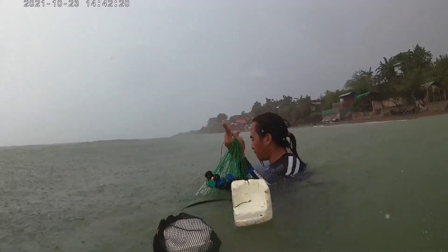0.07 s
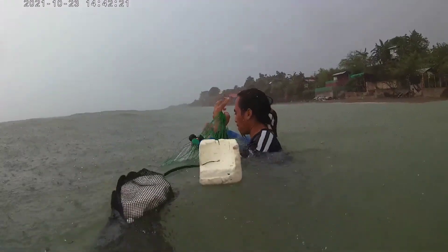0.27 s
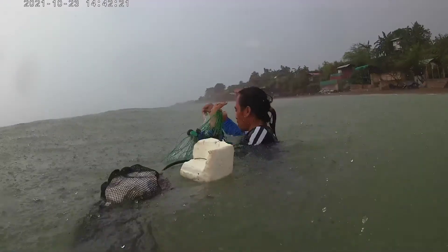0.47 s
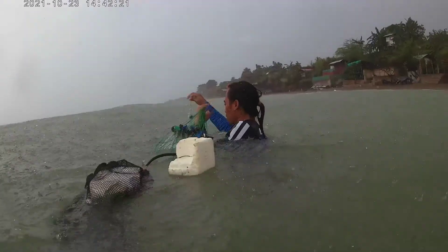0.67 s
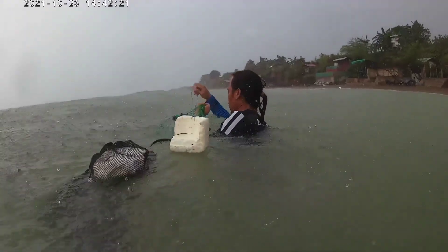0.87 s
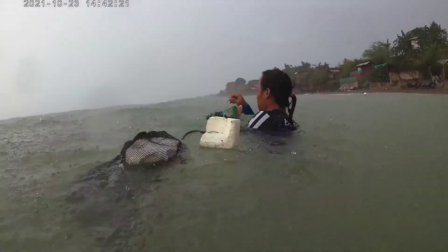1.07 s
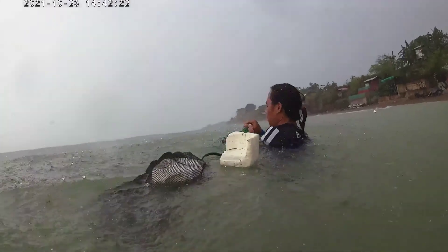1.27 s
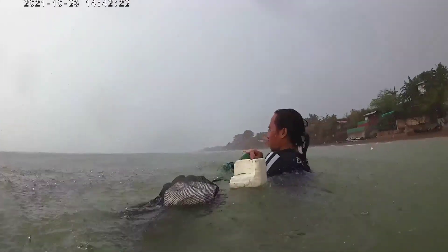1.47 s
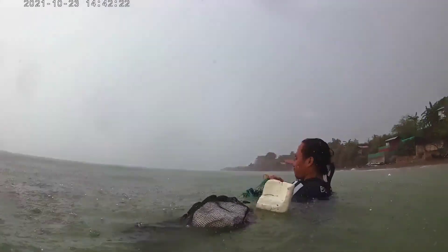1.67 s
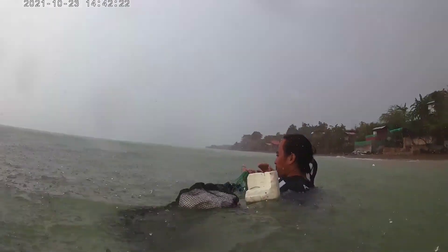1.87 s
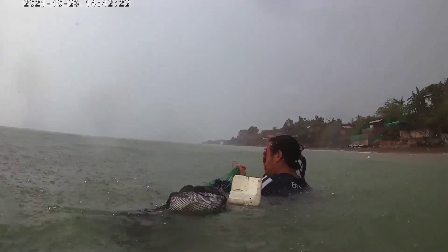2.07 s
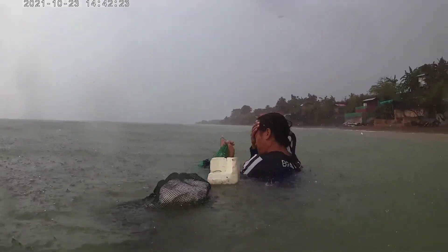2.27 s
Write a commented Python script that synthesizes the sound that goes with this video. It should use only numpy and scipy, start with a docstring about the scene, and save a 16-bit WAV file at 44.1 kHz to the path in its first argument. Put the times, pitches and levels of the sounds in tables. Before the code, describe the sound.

Irregular close taps, ticks and small thumps come from rain striking a camera housing held at sea level. A few tiny bubbles plop among them, over soft rain hiss and rumbling swell. The microphone inside sounds dull and enclosed.

```python
"""Raindrops and small splashes strike a waterproof camera case, held at the surface of the sea. Heard point-
blank, each drop rings the case with a thump, a knock and a tick; some trap an air bubble that sings briefly.
Behind them fine rain patters on the case, rain hisses on the water around it and swell rumbles against it. The
sound reaches only to about 4 kHz and overloads on the hardest hits."""
import sys
import numpy as np
from scipy import signal
from scipy.fft import rfft, irfft
from scipy.io import wavfile

SR = 44100
rng = np.random.default_rng(int(sys.argv[2]) if len(sys.argv) > 2 else 0)


def output_pcm(signal):
    """Save a mono or channel-first signal as 16-bit PCM at the path in sys.argv[1].

    Samples are clipped to [-1, 1] before scaling.
    """
    pcm = np.clip(np.atleast_2d(signal).T, -1, 1) * 32767
    wavfile.write(sys.argv[1], SR, np.round(pcm).astype(np.int16))


N = 101650

# drops on the case, peak levels before the trims
# (time [s], knock [dB], thump [dB], tick [dB], knock centre [Hz], tick centre [Hz])
DROPS = [(0.0224,-8,-15,-13.5,1280,2400),(.0280,-5,-29.5,-14.5,1203,2580),(0.069,-26,-56,-13,1310,2870),(0.0804,-22,-33,-9,1190,2850),(0.084,-7,-30.5,-19,900,2280),
         (0.268,-23.5,-29,-43.5,1290,2000),(0.3663,-9.5,-10,-26,1316,2380),(0.3777,-13,-20,-15,1250,3600),(0.3897,-16,-19,-38.5,1200,2000),(.5760,-14,-38,-11.5,1010,3070),
         (0.5919,-5.5,-14.5,-12,1238,2520),(0.714,-6,-20.5,-22,1300,2720),(.729,-54,-52,-27,1370,2660),
         (0.8195,-20,-27.5,-25.5,1340,2140),(0.9226,-8,-25,-10.5,1203,1970),(0.9243,-13,-32.5,-35.5,1300,2280),(0.97,-24.5,-34,-31.5,1320,3100),(1.0099,-24,-36.5,-30,1260,2740),(1.1021,-18.5,-22.5,-22,1300,2800),
         (1.1356,-15.5,-22.5,-22.5,1220,2020),(1.1441,-12.5,-18.5,-25.5,1110,2960),(1.1622,-13,-29,-18,1100,2070),
         (1.1948,-11.5,-43,-13,1330,2930),(1.2086,-6,-15,2.5,1184,2356),(1.2933,-21,-45,-62.5,1020,1980),(1.3332,-13.5,-17.5,-35.5,913,2300),
         (1.4283,-25,-37,-19.5,1300,2800),(1.4339,-12.5,-20,-20,1360,2040),(1.4639,-20,-61,-14.5,850,2200),(1.4972,-1,-6.5,-12,1090,2770),(1.537,-23,-29.5,-28,900,2000),
         (1.6347,-10,-35,-7,1150,2760),(1.6622,-14.5,-26,-11,1142,2800),(1.69,-21,-55.5,-18.5,1200,3400),(1.698,-9.5,-31.5,-32,1220,2210),(1.727,-8.5,-10.5,-51,1320,1900),
         (1.754,-13,-24.5,-18.5,1340,2500),(1.793,-10,-32,-40,1320,1900),(1.8154,-19,-49,-11,1280,1960),(1.8444,-9,-21,-17.5,1260,2840),(1.8543,1,-11,5,1110,2690),
         (1.8932,-7,-19,-7,935,1950),(1.9548,-20,-25.5,-16.5,1320,2400),(1.9769,-10,-15.5,-11.5,1050,2550),(2.0264,-18.5,-55,-14.5,1250,2160),(2.0401,-14.5,-13,-23.5,835,2140),
         (2.131,-26,-33.5,-33,1000,2870),(2.1878,-5.5,-21.5,-7.5,1050,2320),(2.2131,-12,-38,-16,1230,2490),(2.2220,-11,-51,-18.5,950,2740)]
# resonances of the case (frequency [Hz], relative level [dB], t60 [s])
CASE_MODES = [(173,-2,0.044),(327,8,0.02),(487,-3,0.0072),(804,-4,0.024),(996,-4,0.023),(1106,-7.5,0.016),(1271.5,1.5,0.016),(1624,-3,0.015),(2079,3.5,0.0076),(2400,3,0.005),(2753,2,0.006),(3271,6,0.01),(3742,0,0.014)]
# trapped air bubbles (time [s], starting pitch [Hz], level [dB], t60 [s])
BUBBLE_NOTES = [(0.1,414,-23,0.012),(0.3657,1200,-19,0.016),(.594,369,-18.5,0.058),(0.717,1897,-11,0.016),(0.717,146,-18,0.038),(1.1030,326,-19,0.045),(1.209,760,-14,0.031),(1.73,326,-22,0.016),(1.733,165,-21,0.045),(1.8541,1021,7,0.015),(1.9763,1562,-7,0.03)]
# fine rain on the case (time [s], level [dB])
PATTER_LEVEL = [(0,-34.5),(.3,-44.5),(.8,-39.5),(1.05,-46),(1.17,-34),(1.28,-53),(1.45,-33.5),(1.7,-41.5),(1.87,-30),(2,-39),(2.3,-42.5)]
# water moving against the case (frequency [Hz], relative density [dB])
RUMBLE_SPECTRUM = [(15,-10),(70,-0.5),(110,-11.5),(160,-2.5),(220,-16),(900,-51.5),(5000,-100)]
# rise and fall of that rumble (time [s], level [dB])
RUMBLE_LEVEL = [(0,-35),(.26,-48),(.42,-40),(.55,-43.5),(.8,-44.5),(.89,-24),(.96,-41),(1.25,-41.5),(1.32,-36.5),(1.4,-44),(1.87,-31.5),(2.13,-39)]
# rain on the sea, heard through the case (frequency [Hz], relative density [dB])
SEA_RAIN_SPECTRUM = [(100,-15.5),(250,2),(350,4),(780,-6.5),(1130,-11),(1320,0),(1600,-6),(2050,0),(2600,-29),(4200,-32.5)]

THUMP_LOW_HZ, THUMP_TOP_HZ, KNOCK_TOP_HZ = 89, 670, 1670
THUMP_TRIM_DB, TICK_TRIM_DB = 0.5, 1.5
POCKET_BEST_HZ, POCKET_T60_S = 1280, 0.01
LEAD_IN_SHARE, SPREAD_SHARE, SPRAY_SHARE = 0.028, 0.055, 0.023
LEAD_IN_S, SPREAD_S, SPRAY_S = 0.0025, 0.0013, 0.009
RAGGED_DB_PER_DB, TYPICAL_DROP_DB = 0.34, -8
MIC_TOP_HZ, MIC_LEAK_DB, BAND_LIMIT_HZ = 3684, -35.5, 15700


def drops_on_case():
    """Point-blank hits: each rings the low, middle and high modes, and an air pocket adds to the knock."""
    out, hz = np.zeros(N), np.array(CASE_MODES)[:, 0]
    low, high = hz < THUMP_TOP_HZ, hz > KNOCK_TOP_HZ
    middle = ~low & ~high
    for start, knock_db, thump_db, tick_db, knock_hz, tick_hz in DROPS:
        modes = case_modes()
        push = splat(max(knock_db, tick_db))
        thump = cut(low @ modes, THUMP_TOP_HZ, "low", order=2)
        thump = cut(thump, THUMP_LOW_HZ, "high", order=2)
        pocket = nearness(knock_hz, POCKET_BEST_HZ) * ring(knock_hz, POCKET_T60_S)
        knock = (nearness(hz, knock_hz) * middle) @ modes + pocket
        knock = cut(knock, KNOCK_TOP_HZ, "low")
        knock = cut(knock, THUMP_TOP_HZ / 2, "high", order=1)
        tick = (nearness(hz, tick_hz) * high) @ modes
        tick = cut(tick, THUMP_TOP_HZ, "high", order=2)
        levels_db = thump_db + THUMP_TRIM_DB, knock_db, tick_db + TICK_TRIM_DB
        lead_s = len(push) / 2 / SR  # the blow sits in the middle of the push
        for part, db in zip((thump, knock, tick), levels_db):
            hit = signal.fftconvolve(part, push)
            add(out, start - lead_s, undb(db) * hit / np.abs(hit).max())
    return out


def splat(strength_db, size=1500):
    """A drop's push: the blow, spreading, faint spray. Weak, glancing drops are more ragged."""
    t = np.arange(-size, size + 1) / SR
    lead_in = LEAD_IN_SHARE * np.exp(-abs(t) / LEAD_IN_S)  # faint, short noise that softens the attack
    blow = t == 0
    spreading = SPREAD_SHARE * np.exp(-abs(t) / SPREAD_S)
    spray = SPRAY_SHARE * np.exp(-abs(t) / SPRAY_S)
    ragged = undb(RAGGED_DB_PER_DB * (TYPICAL_DROP_DB - strength_db))
    return blow + ragged * rng.standard_normal(len(t)) * np.where(t < 0, lead_in, spreading + spray)


def case_modes(scatter_db=1.5, detune=.03):
    """One ring per mode of the case; strength and pitch vary with the spot that is struck."""
    hz, db, t60 = np.array(CASE_MODES).T[:, :, None]
    pitch_draw, level_draw = rng.standard_normal((2, len(CASE_MODES), 1))
    return undb(db + scatter_db * level_draw) * ring(hz * (1 + detune * pitch_draw), t60)


def ring(hz, t60, build_s=0.00038, size=4096):
    """A struck resonance: a sine that builds up and dies away."""
    t = np.arange(size) / SR
    envelope = (1 - np.exp(-t / build_s)) * np.exp(-np.log(1000) * t / t60)
    return envelope * np.sin(2 * np.pi * hz * t)


def nearness(hz, centre_hz, octaves=0.4):
    """A resonance responds more strongly the nearer it lies to the pitch that the case favours."""
    return np.exp(-.5 * (np.log2(hz / centre_hz) / octaves) ** 2)


def bubbles(rise_per_s=0.97, attack_s=0.0021, size=4096):
    """Close by, air trapped by a drop rings and rises slightly in pitch."""
    out, t = np.zeros(N), np.arange(size) / SR
    for start, hz, db, t60 in BUBBLE_NOTES:
        envelope = (1 - np.exp(-t / attack_s)) * np.exp(-np.log(1000) * t / t60)
        tone = np.sin(2 * np.pi * hz * t * (1 + rise_per_s * t / 2))
        add(out, start, undb(db) * envelope / envelope.max() * tone)
    return out


def fine_rain(spots=8, drops_per_s=1000, spread_db=3.5, bass_db=-10, treble_db=-10):
    """Behind the big hits, tiny drops land at random on several spots of the case and ring it faintly."""
    out, hz = np.zeros(N), np.array(CASE_MODES)[:, 0]
    weight = undb(bass_db * (hz < THUMP_TOP_HZ) + treble_db * (hz > KNOCK_TOP_HZ))
    for _ in range(spots):
        lands = rng.random(N) < drops_per_s / spots / SR
        strength = undb(spread_db * np.minimum(rng.exponential(size=N), np.pi))
        polarity = rng.choice([-1, 1], len(hz))
        spot_ring = (weight * polarity) @ case_modes()
        out += signal.fftconvolve(lands * strength, spot_ring)[:N]
    return unit(cut(out, MIC_TOP_HZ, "low", order=8)) * curve(PATTER_LEVEL)


def swell():
    """At the waterline the sea moves against the case with a low, uneven rumble."""
    return noise(RUMBLE_SPECTRUM) * curve(RUMBLE_LEVEL)


def rain_on_sea(level_db=-47):
    """Farther off, rain on the water merges into a steady hiss, dulled by the case."""
    return undb(level_db) * noise(SEA_RAIN_SPECTRUM)


def undb(db):
    """Decibels to gain."""
    return 10 ** (np.asarray(db) / 20)


def curve(rows):
    """Gain over time from (time [s], level [dB]) points."""
    return undb(np.interp(np.arange(N) / SR, *np.array(rows).T))


def unit(x):
    """Scale to rms 1."""
    return x / np.std(x)


def cut(x, hz, kind, order=4):
    """Butterworth filter."""
    return signal.sosfilt(signal.butter(order, hz, kind, fs=SR, output="sos"), x)


def noise(points):
    """Noise of rms 1, coloured by (frequency [Hz], relative density [dB]) points."""
    hz, db = np.array(points).T
    bin_hz = np.maximum(np.fft.rfftfreq(N, 1 / SR), 1)
    colour = undb(np.interp(np.log(bin_hz), np.log(hz), db))
    return unit(irfft(rfft(rng.standard_normal(N)) * colour, N))


def add(out, start, x):
    """Mix a sound in at a time in seconds."""
    at = int(start * SR) + np.arange(len(x))
    inside = (at >= 0) & (at < N)
    out[at[inside]] += x[inside]


def scene():
    """At the sea surface, in mono: close drops and bubbles over fine rain, swell and hiss."""
    background = rain_on_sea() + swell() + fine_rain()
    return (drops_on_case() + bubbles() + background)[None]


def record(dry):
    """A narrow-band microphone that lets a trace of treble through and clips on the loudest peaks."""
    lowpass = signal.firwin(65, MIC_TOP_HZ, fs=SR, window="hann")
    muffled = signal.fftconvolve(dry, lowpass[None], mode="same")
    clipped = np.clip(muffled + undb(MIC_LEAK_DB) * dry, -1, 1)
    band_limit = signal.ellip(8, .2, 70, BAND_LIMIT_HZ, fs=SR, output="sos")
    return signal.sosfilt(band_limit, clipped)


dry = scene()
out = record(dry)
output_pcm(out)
```